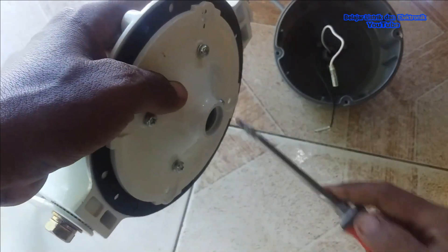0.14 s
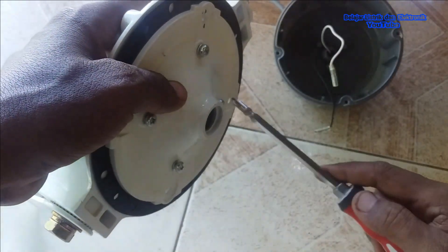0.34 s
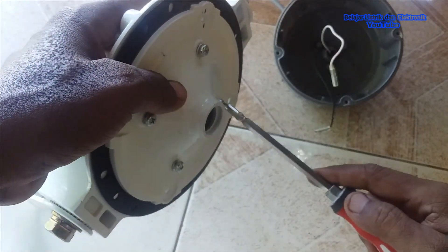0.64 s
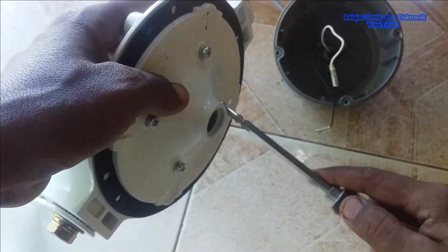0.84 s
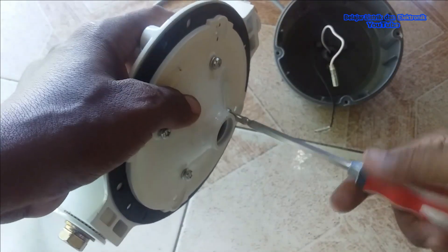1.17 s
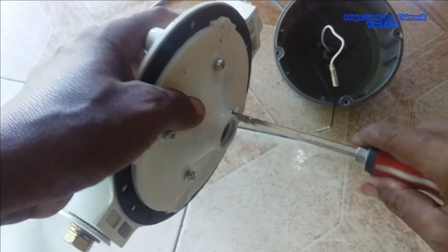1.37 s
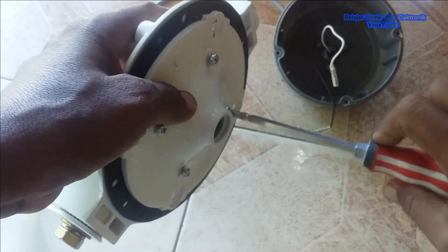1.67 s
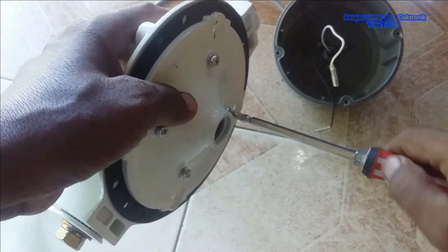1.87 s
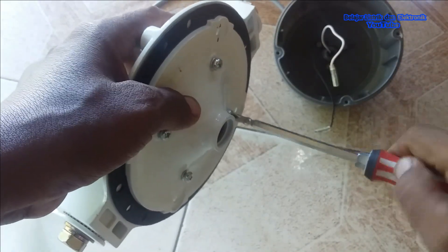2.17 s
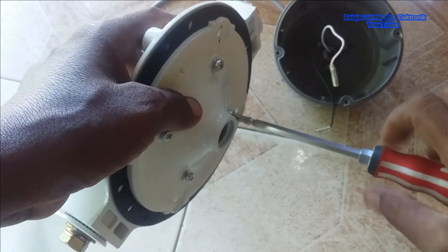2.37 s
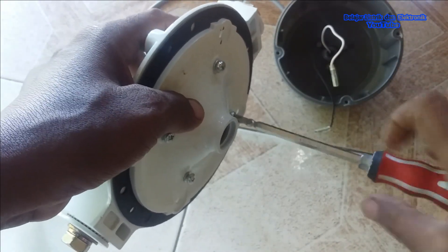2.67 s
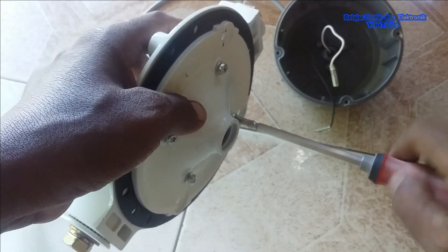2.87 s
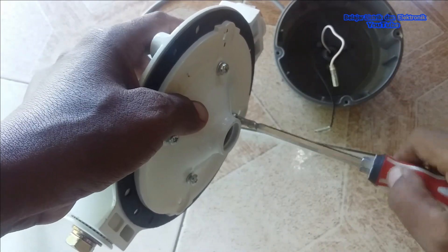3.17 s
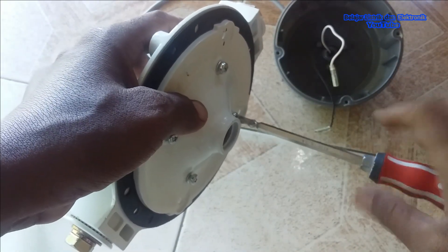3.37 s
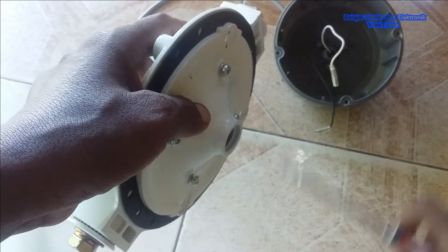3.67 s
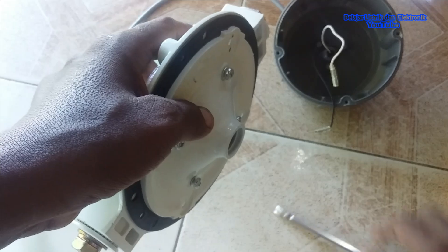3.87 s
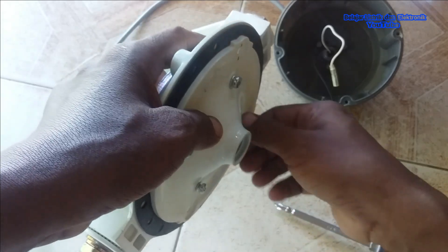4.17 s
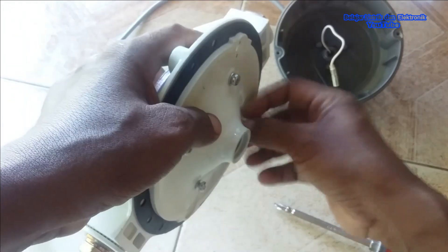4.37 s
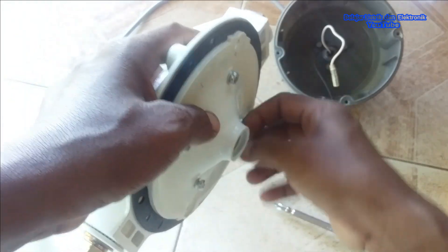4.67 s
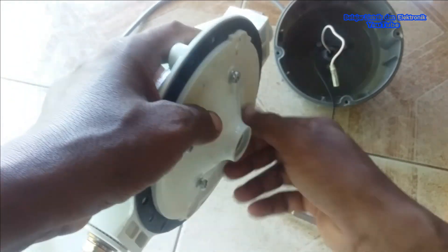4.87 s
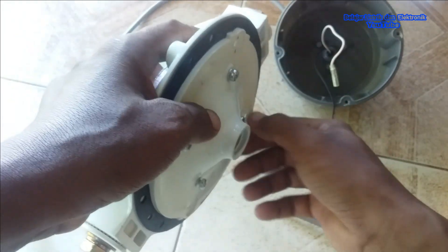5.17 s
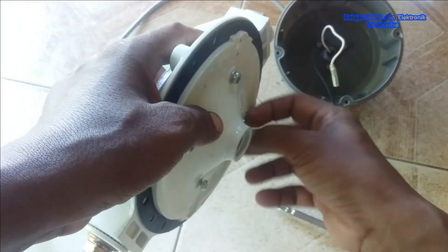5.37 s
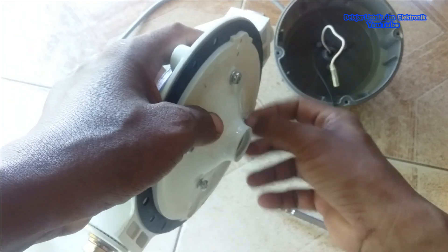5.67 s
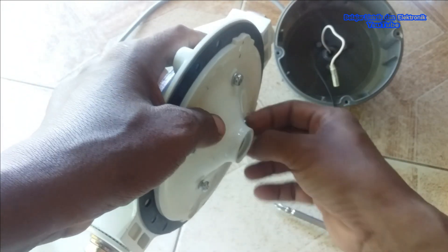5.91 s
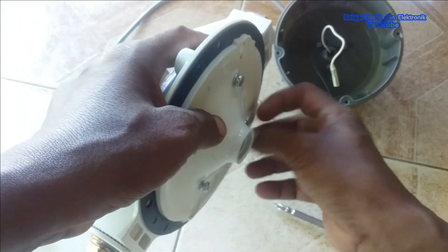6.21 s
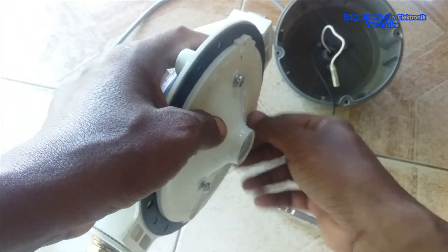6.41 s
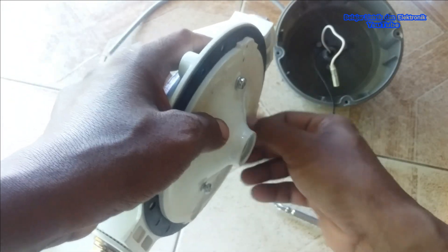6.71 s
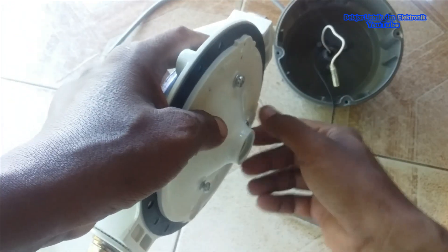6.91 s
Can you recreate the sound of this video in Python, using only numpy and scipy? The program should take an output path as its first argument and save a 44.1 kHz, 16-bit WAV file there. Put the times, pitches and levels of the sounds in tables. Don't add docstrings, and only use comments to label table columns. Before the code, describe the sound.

Close, small hard knocks and faint thread ticks on hollow plastic, a tool bouncing on tiles, then brisk metallic finger clicks over low rumble and hiss.

```python
import sys
import numpy as np
from scipy import signal
from scipy.fft import rfft, irfft
from scipy.io import wavfile

SR = 44100
rng = np.random.default_rng(int(sys.argv[2]) if len(sys.argv) > 2 else 0)


def undo_db(level):
    steps = np.asarray(level, float) / 20
    return 10 ** steps


def transcribe(signal):
    frames = np.atleast_2d(signal).T
    limited = np.clip(frames, -1, 1)
    pcm = np.round(limited * 32767).astype(np.int16)
    wavfile.write(sys.argv[1], SR, pcm)


N = 310905

# frequency [Hz], level [dB], decay time t60 [s].
HOUSING = [(930, -12.5, 0.058), (1074.6, -6, 0.097), (1197, -14, 0.027), (1327, -9, 0.015),
           (2010, -18, 0.23), (2017, 0, 0.11), (2307, 1, 0.082), (2678, -8.5, 0.37), (3325, -13, 0.12),
           (3710, -5.5, 0.032), (4140, -5.5, 0.024), (4456, 3.5, 0.032), (4760, -6, 0.035),
           (5140, -5.5, 0.017), (5438, -6, 0.043), (5690, -11.5, 0.042), (5490, -30, 0.02),
           (7400, -36, 0.0067), (7600, -18, 0.013)]


def turning_and_twirling():
    # start [s], plate level [dB], bracket level [dB],
    # lean of the bracket to its low ring [dB], tick level [dB].
    turns = [(0.079, -60, -73, 3, -61), (0.139, -79, -75, -2, -61.5), (1.657, -60, -66.5, 2.5, -62.5),
             (1.875, -70, -70.5, 7.5, -68), (2.289, -65, -73, 1, -66), (2.586, -51, -79, -2, -71),
             (2.643, -57, -72, 7, -66), (2.96, -52, -65, 10.5, -78), (3.165, -61, -71.5, 5, -76),
             (3.269, -59, -67, 9, -67), (3.519, -59, -70, 5, -66), (3.545, -58, -51, 1, -67)]
    # [s, dB, dB, dB, dB].
    twirls = [(5.269, -48.5, -58, 11.5, -56), (5.371, -40.5, -57, 2, -44.5), (5.389, -43, -50.5, 2.5, -57),
              (5.446, -36.5, -53.5, -2.5, -44), (5.557, -55.5, -58, 6.5, -53.5),
              (5.611, -61, -60, 11.5, -53), (5.822, -49.5, -53, 1, -55.5), (5.93, -56, -79, -7, -64.5),
              (5.965, -55, -69.5, 10, -63), (6.229, -42.5, -68, -2, -40.5), (6.237, -37.5, -59, 6, -51.5),
              (6.423, -54, -55.5, 3, -71), (6.474, -52.5, -64, 1, -60.5), (6.587, -60, -68, 8, -61.5),
              (6.623, -52, -64.5, 7.5, -72), (6.674, -50, -48.5, 0.5, -46), (6.704, -61, -49, -0.5, -56),
              (6.734, -45, -65.5, -16.5, -44), (6.801, -57.5, -65, -3, -52.5), (6.969, -45, -72, 2.5, -71)]
    return taps(turns + twirls, ring_db=0, crack_db=-4.5, rattle_db=-15, top_db=-45, bright_db=-10)


def snapping():
    # start [s], plate level [dB], bracket level [dB], lean to its low ring [dB], tick level [dB].
    snaps = [(4.166, -56, -45.5, 7, -38), (4.297, -48, -55, 1, -64), (4.311, -70, -48, 2, -48.5),
             (4.332, -41.5, -47.5, -3, -44.5), (4.392, -52, -52, 4, -51.5), (4.413, -37.5, -37, -0.5, -28),
             (4.444, -50, -54, 10, -54), (4.468, -47.5, -48, 0, -48), (4.63, -50, -45.5, 2, -39.5),
             (4.656, -44, -69, 0, -51), (4.681, -46, -60, 2, -63), (4.692, -43, -58, -4, -38.5),
             (4.95, -47, -38, 2, -38), (5.011, -52.5, -66, 7, -51.5)]
    return taps(snaps, ring_db=-3.5, crack_db=-6, rattle_db=-31, top_db=-60, bright_db=2.5)


def taps(rows, **character):
    groups_hz = [800, 1700, 2170, 2500, 2750, 3500, 6500]
    s, plate, bracket, lean, tick = np.transpose(rows)
    low_ring = bracket + lean
    high_ring = bracket - lean
    partner = bracket + 0.92 * lean - 8.5
    base = bracket + 0.76 * lean
    upper = base + 0.98 * (tick - base) - 2
    hits = np.transpose([s, plate, low_ring, high_ring, partner, upper, tick])
    return struck(hits, HOUSING, groups_hz, **character)


def knocking():
    # start [s], thud level [dB], plate level [dB], ring level [dB], tick level [dB].
    knocks = [(0.5535, -43.5, -44, -49, -40), (0.779, -38.5, -48, -42, -43.5),
              (0.79, -32, -38.5, -26.5, -28.5), (0.833, -33.5, -43, -46, -49),
              (0.909, -41, -43, -42.5, -52.5), (1.026, -27.5, -50, -42, -53), (1.222, -62, -67, -74, -75),
              (1.312, -43.5, -50, -46, -57), (1.438, -60, -62, -62.5, -71), (2.197, -47, -64, -62, -72),
              (2.948, -45, -59, -61, -70), (4.19, -30, -45, -27, -41.5)]
    # frequency [Hz], level [dB], decay time t60 [s].
    shell = [(194.7, -10.5, 0.16), (339, -4.5, 0.078), (422, 1.5, 0.052), (539, 7.5, 0.022),
             (740, -3, 0.018), (896, 1, 0.034), (944, -1, 0.068), (1102, 5.5, 0.039), (1314, 4, 0.054),
             (1510, 2, 0.059), (1845, 1, 0.019), (2024, -5, 0.089), (2420, -11.5, 0.027),
             (2689, -5.5, 0.24), (2870, -10, 0.13), (3060, 2, 0.036), (3330, -6.5, 0.21),
             (3580, -11, 0.035), (3990, -0.6, 0.037), (4220, -15.5, 0.08), (5140, -22, 0.012),
             (6260, -29, 0.01), (8750, -25, 0.024)]
    groups_hz = [150, 800, 1700, 2500, 3500, 6500]
    s, thud, plate, middle, tick = np.transpose(knocks)
    upper = np.minimum(middle, tick) - 10
    hits = np.transpose([s, thud, plate, middle, upper, tick])
    return struck(hits, shell, groups_hz, ring_db=0.5, crack_db=-10.5, rattle_db=-18, top_db=-33, bright_db=2.5)


def dropped_driver():
    # start [s], strength of the blow [dB], handle thud [dB], tip clink [dB].
    bounces = [
        (3.805, -29, -33.5, -34),
        (3.866, -38, -37, -32),
        (3.892, -41.5, -37.5, -63),
        (3.928, -50, -31, -43),
        (3.962, -54, -35, -76),
    ]
    # frequency [Hz], level [dB], decay time t60 [s].
    driver = [(380, -9.5, 0.039), (550, -15, 0.075), (927, -9.5, 0.053), (1160, 8, 0.011),
              (1434, -1, 0.023), (2510, 9.5, 0.012), (2390, -11.5, 0.096), (2680, -22, 0.038),
              (3500, 5, 0.0092), (3770, -19.5, 0.035), (4200, -21, 0.0091), (5160, 5, 0.0078),
              (6160, 3, 0.013), (6770, -23, 0.025)]
    groups_hz = [300, 800, 1700, 2900, 4900, 7000]
    s, blow, thud, clink = np.transpose(bounces)
    shaft = blow[0] + 1.53 * (blow - blow[0]) + 5.5
    hits = np.transpose([s, thud, blow, shaft, clink, blow - 9])
    return struck(hits, driver, groups_hz, ring_db=2.5, crack_db=-6, rattle_db=-23, top_db=-12, bright_db=2.5)


def struck(hits, modes, edges, ring_db, crack_db, rattle_db, top_db, bright_db):
    table = np.array(hits)
    at, group_db = (table[:, 0] * SR).astype(int), table[:, 1:]
    luck = rng.standard_normal((len(at), len(modes)))
    grit = rng.standard_normal((2, N))
    out, rattle = np.zeros(N), []
    for group, (low, high) in enumerate(zip(edges, edges[1:])):
        force = np.zeros(N)
        force[at] = undo_db(group_db[:, group])
        rattle.append(fading(force, 0.011) * grit[0])
        inside = [hz for hz, level_db, t60 in modes if low < hz < high]
        low, high = 0.93 * min(inside), 1.07 * max(inside)
        burst = fading(force, 0.001) * grit[1] + undo_db(-17) * rattle[-1]
        out += undo_db(crack_db) * band(burst, low, high) * np.sqrt(SR / 2 / (high - low))
    for k, (hz, level_db, t60) in enumerate(modes):
        group = min(np.searchsorted(edges, hz), len(edges) - 1) - 1
        mode_db = level_db + ring_db + bright_db * (hz > 5000)
        force = rattle[group] * undo_db(rattle_db) / np.sqrt(t60 * SR)
        force[at] += undo_db(group_db[:, group] + 1.5 * luck[:, k])
        rise_t60 = min(14 / hz, t60 / 2)
        swing = ring(force, hz, t60) - ring(force, hz, rise_t60)
        out += (-1) ** k * undo_db(mode_db) * swing
    sharp = np.zeros(N)
    sharp[at] = undo_db(1.42 * (group_db[:, -1] + 31) + top_db)
    return out + band(fading(sharp, 0.00085) * grit[1], 14440, 22000)


def ring(force, hz, t60):
    r, w = undo_db(-60 / (t60 * SR)), 2 * np.pi * hz / SR
    return signal.lfilter([0, np.sin(w)], [1, -2 * r * np.cos(w), r * r], force + 1e-18)


def fading(force, seconds):
    r = np.exp(-1 / (seconds * SR))
    return signal.lfilter([np.e * (1 - r)], [1, -2 * r, r * r], force + 1e-18)


def rubbing():
    # start [s], level [dB], length [s], brightness [dB].
    rubs = [
        (1.242, -37.5, 0.037, -5),
        (2.58, -55.5, 0.065, -30),
        (2.94, -48, 0.033, 1),
        (3.272, -43.5, 0.021, -3),
        (2.2, -65, 0.06, -12),
        (3.529, -53, 0.05, 4),
        (3.932, -47, 0.04, -7),
        (6.2146, -52.5, 0.039, 11),
    ]
    t, out = np.arange(N) / SR, np.zeros(N)
    slips = (rng.random(N) < 2500 / SR) * rng.standard_normal(N)
    body = rms_one(sum(undo_db(level_db) * ring(slips, hz, 2.2 * t60) for hz, level_db, t60 in HOUSING))
    dull = rms_one(band(slips, 1000, 3000))
    bright = rms_one(band(slips, 3000, 5800))
    for s, level_db, length, bright_db in rubs:
        along = np.clip((t - s) / max(length, 0.005), 0, 30)
        stroke = np.sqrt(along) * np.exp(-2.5 * along)
        out += undo_db(level_db - 8) * stroke * (0.05 * body + 1.77 * dull + undo_db(bright_db) * bright)
    return out


def bump():
    # frequency [Hz], level [dB], length [s].
    jolt = (52, -45, .06)
    hz, level_db, length = jolt
    along = np.clip((np.arange(N) / SR - 0.875) / length, 0, 1)
    return undo_db(level_db) * np.sin(np.pi * along) ** 2 * np.sin(2 * np.pi * hz * along * length)


def room(x, wet_db):
    # frequency [Hz], decay time t60 [s].
    room_t60 = [(300, 0.17), (2000, 0.18), (6000, 0.14), (14000, 0.15)]
    t, tail = np.arange(SR // 2) / SR, 0
    edges = 150 * 2 ** np.arange(0, 7.0)
    for low, high in zip(edges, np.minimum(2 * edges, 17000)):
        decay = undo_db(-60 * (t / at_hz(room_t60, 1.74 * low)) ** 1.5)
        tail = tail + band(rng.standard_normal(len(t)), low, high) * decay
    tail = tail * np.clip(t / 0.00098, 0, 1)
    return undo_db(wet_db) * signal.fftconvolve(x, tail / np.sqrt(np.sum(tail ** 2)))[:N]


def rumble():
    # frequency [Hz], density [dB per Hz].
    rumble_colour = [(15, -65), (25, -29), (43, -21), (64, -7), (97, 3.5), (194, -4.5), (226, -13),
                     (287, -11.5), (316, -18.5), (418, -23), (454, -23), (515, -27), (700, -41.5),
                     (910, -59), (1540, -120)]
    # centre [s], rise [dB], half width [s].
    swells = [(0.68, 1, .2), (1.3, 1, 0.13), (2.04, 3, 0.085), (2.39, 7, 0.15), (2.81, 7.5, 0.087),
              (3.2, 5, 0.1), (3.75, 4, 0.27), (4.95, 4.5, 0.17), (5.58, 2.5, 0.17), (6.161, 2.5, 0.1),
              (6.77, 7.5, 0.1)]
    # centre [s], rise [dB], half width [s].
    upper_swells = [
        (0.585, 13.5, 0.033),
        (0.96, 7, 0.15),
        (2.2, 2.5, 0.17),
        (2.6, 3.5, .12),
        (3.98, 7, 0.1),
        (4.2, 3.5, 0.25),
    ]
    whole = coloured(rumble_colour)
    deep = signal.sosfiltfilt(signal.butter(3, 265, fs=SR, output="sos"), whole)
    return swelling(-50, swells) * rms_one(deep) + swelling(-65, upper_swells) * rms_one(whole - deep)


def swelling(rest_db, rows):
    t = np.arange(N) / SR
    return undo_db(rest_db + sum(rise_db * np.exp(-((t - s) / width) ** 2) for s, rise_db, width in rows))


def hiss():
    # frequency [Hz], density [dB].
    hiss_colour = [(290, -36), (500, 0), (800, -0.5), (1600, -6), (4000, -12.5), (10000, -25), (13500, -26),
                   (14000, -24), (14400, -9), (15720, -19), (15800, -68)]
    return undo_db(-68.5) * coloured(hiss_colour)


def whines():
    whine_hz = [11177, 15078]
    # line level [dB], skirt level [dB], skirt width [Hz].
    whine_levels = [
        (-82.5, -91, 40),
        (-69, -76.5, 280),
    ]
    t, out = np.arange(N) / SR, 0
    for hz, (line_db, skirt_db, width) in zip(whine_hz, whine_levels):
        wander = np.cumsum(rng.standard_normal(N)) * np.sqrt(2 * np.pi * 1.1 / SR)
        line = np.sqrt(2) * np.sin(2 * np.pi * hz * t + wander)
        skirt = signal.lfilter(*signal.iirpeak(hz, hz / width, fs=SR), rng.standard_normal(N))
        out = out + undo_db(line_db) * line + undo_db(skirt_db) * rms_one(skirt)
    return signal.sosfilt(signal.ellip(10, 0.5, 60, 15750, fs=SR, output="sos"), out)


def coloured(points):
    hz = np.maximum(np.fft.rfftfreq(N, 1 / SR), 1)
    return rms_one(irfft(rfft(rng.standard_normal(N)) * undo_db(at_hz(points, hz)), N))


def at_hz(points, hz):
    return np.interp(np.log(hz), np.log(np.array(points)[:, 0]), np.array(points)[:, 1])


def rms_one(x):
    return x / np.sqrt(np.mean(x ** 2) + 1e-20)


def band(x, low_hz, high_hz):
    return signal.sosfilt(signal.butter(3, [low_hz, high_hz], "band", fs=SR, output="sos"), x + 1e-18)


def scene():
    near = turning_and_twirling() + snapping() + knocking() + dropped_driver() + rubbing()
    mono = near + room(near, wet_db=-8.5) + bump() + rumble() + hiss() + whines()
    return np.array([mono, mono])


def low_pass(x):
    return signal.sosfilt(signal.butter(12, 16660, fs=SR, output="sos"), x)


def record(dry):
    white = rng.standard_normal((2, N))
    rising = band(signal.lfilter([1, -0.3], [1], white), 370, 14000)
    noise = signal.sosfilt(signal.ellip(10, 0.5, 60, 15200, fs=SR, output="sos"), rising)
    top_cut = signal.cheby2(10, 50, 16700, fs=SR, output="sos")
    mix = signal.sosfilt(top_cut, dry + undo_db(-67.5) * noise)
    return low_pass(mix)


dry = scene()
out = record(dry)
transcribe(out)
```